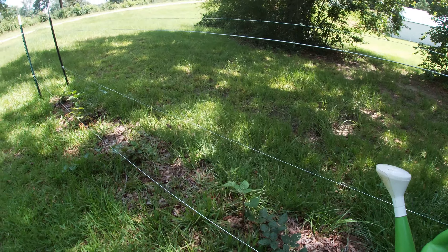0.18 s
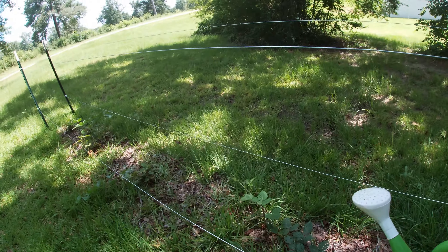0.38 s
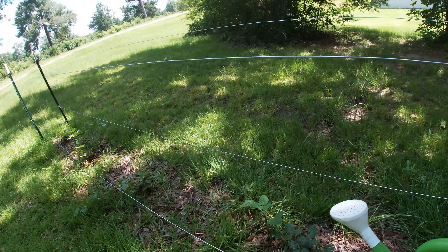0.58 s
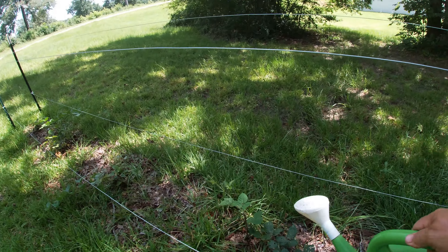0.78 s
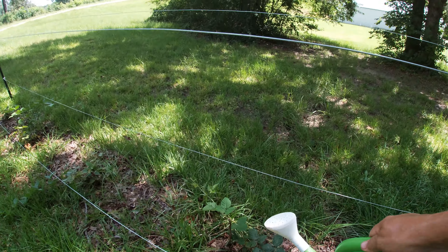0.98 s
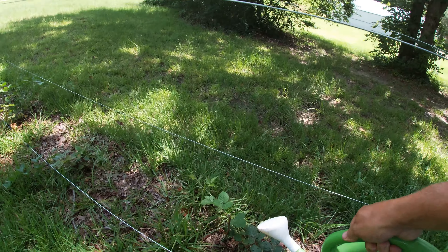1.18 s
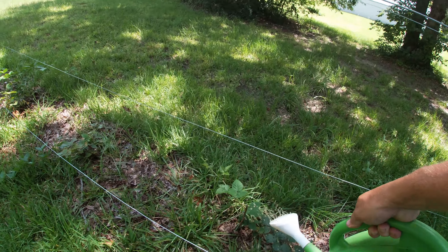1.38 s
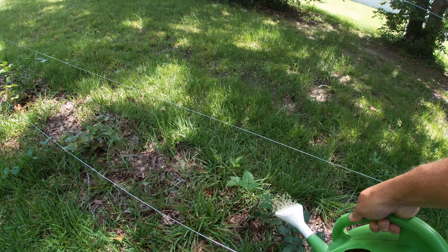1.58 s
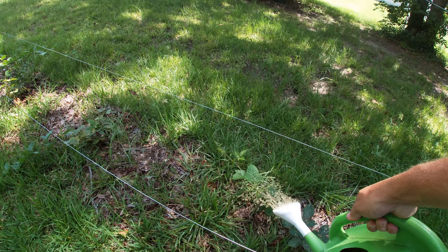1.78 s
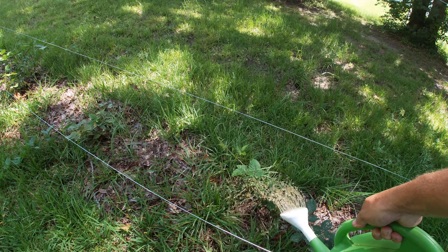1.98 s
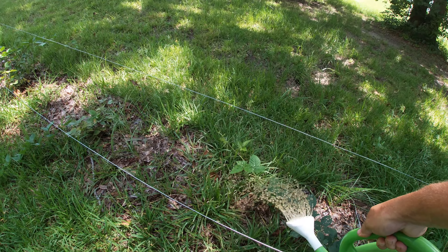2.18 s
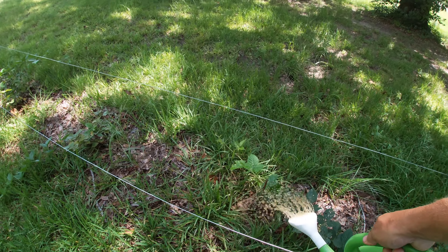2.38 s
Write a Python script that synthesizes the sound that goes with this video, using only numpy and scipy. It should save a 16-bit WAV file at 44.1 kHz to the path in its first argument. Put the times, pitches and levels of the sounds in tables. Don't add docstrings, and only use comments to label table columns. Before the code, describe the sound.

Watering can pouring onto plants, outdoors, close microphone. Soft leaf hiss and a faint distant engine hum throughout. Grass crackles and swishes until 0.4 s; loud low wind thumps the microphone from 0.2 to 0.6 s. One bird chip at 0.64, small stem ticks, then a hollow plastic knock at 1.03. From 1.4 s water gurgles in surges, bubbles and gulps air, with bright drops pattering on leaves to the end.

```python
import sys
import numpy as np
from scipy import signal
from scipy.fft import rfft, irfft
from scipy.io import wavfile
from scipy.ndimage import uniform_filter1d

SR = 44100
rng = np.random.default_rng(int(sys.argv[2]) if len(sys.argv) > 2 else 0)


def digitize_waveform(pressure):
    field = np.atleast_2d(pressure).T
    bounded = np.clip(field, -1, 1)
    quanta = np.round(bounded * 32767).astype(np.int16)
    wavfile.write(sys.argv[1], SR, quanta)


def volts_from_db(level):
    exponent = np.asarray(level, float) / 20
    return 10 ** exponent


N = 105840
T = np.arange(N) / SR


def noise():
    return rng.standard_normal(N)


def sine(hz):
    return np.sin(2 * np.pi * hz * T)


def rms_one(x):
    return x / np.sqrt(np.mean(x ** 2) + 1e-20)


def in_time(rows):
    s, *columns = np.transpose(rows)
    return [np.interp(T, s, column) for column in columns]


def drift(rate_hz):
    step = 40
    r = np.exp(-2 * np.pi * rate_hz * step / SR)
    settle = 2000
    draws = rng.standard_normal(N // step + settle + 2)
    slow = signal.lfilter([1], [1, -2 * r, r * r], draws)[settle:]
    return np.interp(np.arange(N) / step, np.arange(len(slow)), rms_one(slow))


def ring(x, hz, t60_s):
    r = volts_from_db(-60 / (t60_s * SR))
    w = 2 * np.pi * hz / SR
    return signal.lfilter([0, np.sin(w)], [1, -2 * r * np.cos(w), r * r], x + 1e-18)


def colour(x, spectrum):
    hz, db = np.transpose(spectrum)
    octave = np.log2(np.fft.rfftfreq(N, 1 / SR) + 1)
    ends = np.log2(hz)
    beyond = np.maximum(ends[0] - octave, 0) + np.maximum(octave - ends[-1], 0)
    gain_db = np.interp(octave, ends, db) - 36 * beyond
    return rms_one(irfft(rfft(x) * volts_from_db(gain_db), N))


def grains(per_s, spread_db, hiss):
    size = volts_from_db(spread_db * np.minimum(rng.exponential(1, N), 4))
    size = size * rng.choice([-1, 1], N)
    clicks = size * (rng.random(N) < per_s / SR)
    return rms_one(clicks) + hiss * noise()


def burst(s, rise_s, t60_s):
    rise = np.exp(-2 * ((T - s) / rise_s) ** 2)
    fall = volts_from_db(-60 * np.maximum(T - s, 0) / t60_s)
    return np.where(T < s, rise, fall)


def plink(s, db, hz, cycles, rise):
    t = np.arange(int(cycles / hz * SR)) / SR
    fade = volts_from_db(db - 60 * t * hz / cycles)
    soft_start = 1 - np.exp(-t * hz * 2.8)
    turns = hz * (t + rise * hz / cycles * t * t / 2)
    x = fade * np.sin(2 * np.pi * turns) * soft_start
    out = np.zeros(N + SR)
    start = int(s * SR)
    out[start:start + len(x)] = x
    return out[:N]


def plinks(rows, trim_db, cycles, rise):
    return sum(plink(s, db + trim_db, hz, cycles, rise) for s, db, hz in rows)


def fizz(per_s, spread_db, low_hz, high_hz, cycles):
    born = grains(per_s, spread_db, hiss=0)
    dealt = rng.integers(0, 16, N)
    out = np.zeros(N)
    for k, hz in enumerate(np.geomspace(low_hz, high_hz, 16)):
        out += ring(born * (dealt == k), hz, cycles / hz) * np.sqrt(hz)
    return rms_one(out)


# pitch in Hz, level in dB per Hz.
TRAFFIC_TONE = [(25, -8), (150, -4.5), (330, -17), (500, -17), (1400, -22.5), (1750, -23.5)]
LEAF_TONE = [(2200, -10.5), (2800, -8), (4000, -5), (6560, -6.5), (8500, -14.5), (9700, -13),
             (11200, -29.5), (15000, -34)]
# pitch in Hz, width in Hz, level in dB.
ENGINE_HUM = [(72.54, 1, -57), (131.7, 3.7, -65.5), (169.4, 28, -58), (1338, 60, -72)]
# time in seconds, change of the air in
# dB, dry rustle in dB.
AIR_AND_RUSTLE = [
    (0, 1.5, -61),
    (.4, 3, -61.5),
    (.47, 2.5, -73),
    (.69, 0.5, -80),
    (.73, 1.5, -61.5),
    (1.0, 2, -67.5),
    (1.13, 0, -89),
    (1.45, 0.5, -67),
    (2.4, 2, -71),
]


def air():
    out = volts_from_db(-55.5 + drift(8.5)) * colour(noise(), TRAFFIC_TONE)
    leaves = colour(grains(3000, 2.2, hiss=1.77), LEAF_TONE)
    out += volts_from_db(-55.5 + drift(8) / 2) * leaves
    out *= volts_from_db(in_time(AIR_AND_RUSTLE)[0])
    wobble = 0.51 * drift(1.3)
    out += volts_from_db(-59.5 + 0.75 * drift(6.8)) * np.sin(2 * np.pi * 74.4 * T + wobble)
    for hz, width_hz, db in ENGINE_HUM:
        out += volts_from_db(db) * rms_one(ring(noise(), hz, 3.6 / width_hz))
    return out


# time in seconds, level in dB, low whoosh against crackle in dB.
SWISH = [
    (0, -51, -12),
    (.1, -51.5, -1.5),
    (.2, -53, 3),
    (.29, -50.5, 5.5),
    (.45, -44.5, -3),
]
# pitch in Hz, level in dB.
CRACKLE_TONE = [(1500, -2), (1930, -9), (2640, -2), (7980, -6.5), (9990, -11.5), (11200, -24), (15000, -29)]
WHOOSH_TONE = [(300, -12.5), (506, 0), (800, -6), (1700, -15)]


def swish():
    db, low_db = in_time(SWISH)
    fade = np.clip((0.39 - T) / 0.08, 0, 1)
    crackle = volts_from_db(0.5 + 1.3 * drift(30)) * colour(grains(1500, 4.7, hiss=1.2), CRACKLE_TONE)
    whoosh = volts_from_db(2.0 * drift(15)) * colour(noise(), WHOOSH_TONE)
    whistle = sum(rms_one(ring(crackle, k * 1312, 0.12)) / k for k in (1, 2, 3.45))
    low = whoosh + volts_from_db(-6) * whistle
    return fade * volts_from_db(db) * (crackle + volts_from_db(low_db) * low)


# start in seconds, level in dB, pitch in Hz.
TICKS = [
    (0.0712, -45, 2740),
    (0.715, -48.5, 2100),
    (0.826, -47.5, 1950),
    (.923, -50, 2540),
    (.941, -59, 3000),
    (1.506, -54, 2300),
    (1.626, -44, 2400),
    (1.654, -56, 2000),
    (1.786, -37, 2300),
]
# pitch in Hz, level in dB.
RUSTLE_TONE = [(1300, -7), (1900, -4.5), (2700, 8)]


def stems():
    tick_noise = noise()
    out = np.zeros(N)
    for s, db, hz in TICKS:
        out += volts_from_db(db) * burst(s + 0.0011, 0.00076, 0.014) * rms_one(ring(tick_noise, hz, 5.9 / hz))
    out += volts_from_db(in_time(AIR_AND_RUSTLE)[1]) * colour(noise(), RUSTLE_TONE)
    insect = rms_one(ring(noise(), 9630, 0.015))
    rumble = np.clip(T - 1.2, 0, 1) * rms_one(ring(noise(), 38.0, 0.092))
    return out + volts_from_db(-73.5) * insect + volts_from_db(-64) * rumble


# peak time in seconds, level in dB, rise in seconds,
# time to fall 60 dB in seconds, sharp edge against the body in dB.
GUSTS = [
    (0.206, -28, 0.01, 0.29, -28),
    (0.239, -36, 0.032, 0.59, -4.5),
    (0.314, -11.5, 0.011, 0.18, -10.5),
    (0.336, -12.5, 0.0074, 0.12, -38),
    (0.362, -20.5, 0.0051, 0.1, -38),
    (0.399, -13, 0.0093, 0.2, -25),
    (0.436, -19.5, 0.017, 0.12, -32),
    (0.564, -20.5, 0.016, 0.25, -25),
    (0.601, -16.5, 0.017, 0.066, -28.5),
    (.64, -54, 0.036, 0.59, -39),
]
# start in seconds, level in dB, pitch in Hz.
FLAPS = [
    (0.308, -4.5, 157),
    (0.321, -9.5, 190),
    (0.361, -16, 138),
    (0.393, -19, 150),
    (0.435, -22, 175),
    (.409, -26, 327),
    (.556, -29, 298),
    (.584, -24, 170),
]
# pitch in Hz, level in dB.
WIND_TONE = [(20, 11), (35, 5), (70, 4), (150, -1.5), (230, -11), (330, -21.5), (500, -31)]
EDGE_TONE = [(150, -11), (300, 0.5), (550, -2.5), (900, -12.5), (1400, -21), (2200, -37)]


def wind():
    body, edge = np.zeros(N), np.zeros(N)
    for s, db, rise_s, fall_s, edge_db in GUSTS:
        body += volts_from_db(db) * burst(s, rise_s, fall_s)
        edge += volts_from_db(db + edge_db) * burst(s, rise_s * 0.81, fall_s * 0.49)
    low = colour(noise(), WIND_TONE)
    low = low / np.sqrt(uniform_filter1d(low ** 2, size=1400) + 0.17)
    flaps = plinks(FLAPS, 0, cycles=8.0, rise=-0.022)
    return flaps + body * low + edge * volts_from_db(-2.0) * colour(noise(), EDGE_TONE)


def bird():
    start_s, hz, climb_hz_per_s = 0.6362, 4280, 18000
    echo_s, spread_hz = 0.03, 750
    chip = burst(start_s + 0.0011, 0.00079, 0.0088) * sine(hz)
    t = np.maximum(T - start_s, 0)
    smooth = signal.butter(4, spread_hz, fs=SR, output="sos")
    spread = signal.sosfilt(smooth, grains(2300, 2.3, hiss=3.5))
    scatter = rms_one(spread * np.sin(2 * np.pi * (hz * T + climb_hz_per_s * t * t / 2)))
    gate = np.clip(t / 0.002, 0, 1) * np.clip((echo_s - t) / 0.005, 0, 1) * volts_from_db(-180 * t)
    return volts_from_db(-32.5) * chip + volts_from_db(-43) * gate * scatter


# time in seconds, level in dB, pitch in Hz above which it is soft.
KNOCKS = [
    (1.028, -38, 3000),
    (1.0338, -25.5, 3500),
    (1.0365, -30.5, 1500),
    (1.043, -27, 1800),
    (1.049, -62, 900),
    (1.055, -31.5, 1200),
]
# pitch in Hz, level in dB, time to fall 60 dB in seconds.
CAN_WALL = [(240, -5, 0.12), (337, -8.5, 0.081), (656, 0.5, 0.048), (780, 7.5, 0.014), (1235, -7, 0.028),
            (1640, -4.5, 0.024), (2120, -7, 0.029), (2620, -4.5, 0.02), (3290, -1, 0.0074),
            (4200, -5, 0.027)]
# pitch in Hz, level in dB.
SPRING = [(1620, -47), (2380, -39.5), (3120, -50), (4000, -44)]
# pitch in Hz, level in dB.
SLAP_TONE = [(200, 5), (700, -10), (1500, -4), (4300, -10), (5000, -28)]


def knock():
    out = np.zeros(N)
    luck_db = rng.normal(0, 2.45, (len(KNOCKS), len(CAN_WALL)))
    for k, (hz, db, t60_s) in enumerate(CAN_WALL):
        clicks = np.zeros(N)
        for j, (s, hit_db, soft_hz) in enumerate(KNOCKS):
            softness = 1 + (hz / soft_hz) ** 2
            clicks[int(s * SR)] = volts_from_db(hit_db + db - 5.5 + luck_db[j, k]) / softness
        out += ring(clicks, hz, t60_s) * (-1) ** k
    for hz, db in SPRING:
        out += plink(1.042, db, hz, cycles=0.085 * hz, rise=0.35)
    slap = sum(volts_from_db(db - 19) * burst(s + 0.00047, 0.0015, 0.069) for s, db, _ in KNOCKS)
    return out + slap * colour(noise(), SLAP_TONE)


# time in seconds, steady gurgle in dB, patter on leaves in dB.
FLOW = [
    (1.4, -52.5, -60),
    (1.74, -58.5, -63),
    (1.765, -50, -47.5),
    (1.92, -55.5, -61.5),
    (2.03, -54, -51),
    (2.1, -53.5, -52),
    (2.4, -55.5, -49.5),
]
# start in seconds, length in seconds, level in dB.
SURGES = [(1.502, 0.025, -59), (1.601, 0.06, -51), (1.675, 0.039, -52), (1.754, 0.022, -48),
          (1.797, 0.042, -54), (1.863, 0.029, -52), (1.928, 0.048, -51), (1.996, 0.063, -46.5),
          (2.123, 0.077, -49.5), (2.205, 0.067, -52.5), (2.301, 0.036, -56), (2.356, 0.034, -52)]
# start in seconds, level in dB, pitch in Hz.
BUBBLES = [(1.504, -39, 1445), (1.878, -35, 740), (1.931, -42, 1400), (1.953, -39, 704), (1.996, -38, 620),
           (2.034, -35, 1026), (2.046, -38, 1700), (2.135, -39, 1230), (2.148, -39, 1630),
           (2.227, -40, 780), (2.266, -38, 653), (2.284, -41, 626), (1.605, -33, 1436), (1.651, -40, 1450),
           (1.681, -33.5, 1190), (1.76, -40, 785), (1.862, -41, 690), (2.013, -41, 640), (2.159, -35, 1730),
           (2.225, -32, 1510), (2.249, -37, 656), (2.309, -34.5, 1590), (2.362, -41, 1640)]
# start in seconds, level in dB, pitch in Hz.
GULPS = [
    (1.765, -35.5, 290),
    (1.897, -36, 296),
    (2.045, -37.5, 320),
    (1.798, -36, 290),
    (1.832, -32.5, 282),
    (1.876, -28, 195),
    (1.909, -36, 215),
    (1.961, -31, 194),
    (2.021, -30.5, 317),
]
# pitch in Hz, level in dB.
GURGLE_TONE = [(130, -1.5), (200, -6.5), (300, -4), (420, -16.5), (700, -13), (1600, -19), (2600, -20)]
SPOUT_TONE = [(450, -6.5), (700, -5), (1250, -10.5), (1650, -3), (1950, -16), (3500, -19)]
PATTER_TONE = [(2000, -4), (2820, -9.5), (5310, 2), (7170, -9), (8730, -2), (11000, -17), (15000, -26)]
SPLAT_TONE = [(1500, -6), (3000, -6.5), (5500, 1.5), (7300, -3), (8700, 0.5), (10000, -17), (12000, -32)]
# start in seconds, level in dB, pitch in Hz.
DROPS = [(0.211, -40, 4470), (0.3504, -51, 3220), (1.698, -46, 5600), (1.7172, -44, 5500),
         (1.7579, -35.5, 4750), (1.7868, -34, 5800), (1.8105, -39, 5400), (1.8849, -37, 5440),
         (1.9416, -40.5, 5000), (1.962, -38.5, 4600), (2.006, -32.5, 5300), (2.021, -31, 5000),
         (2.0428, -31.5, 5600), (2.128, -40, 6200), (2.147, -39, 5640), (2.205, -34, 4570),
         (2.2227, -28.5, 5200), (2.2628, -33, 6220), (2.2924, -42, 5600), (2.3083, -34, 4200),
         (2.312, -38, 6360), (2.359, -30.5, 6200), (2.366, -32.5, 5500)]
DRIPS = [(1.571, -46, 3380), (1.63, -45, 6200), (1.6494, -40.5, 3230), (1.6853, -41, 5180),
         (1.719, -51, 8860), (1.7613, -40, 8660), (1.763, -35, 5870), (1.8234, -36, 5230),
         (1.84, -40.5, 3940), (1.891, -41.5, 3420), (1.9407, -43, 8980), (1.9642, -42, 8950),
         (1.978, -42.5, 3700), (2.017, -44, 2620), (2.0344, -43, 8650), (2.0744, -44, 8900),
         (2.1355, -37.5, 8560), (2.2036, -44, 8880), (2.234, -38, 4580), (2.264, -41, 2140),
         (2.3677, -45, 8400), (2.377, -34, 5300)]


def pouring():
    return np.clip((T - 1.386) / 0.17, 0, 1)


def spout():
    bubbles = fizz(230, 3.2, 597, 1870, cycles=24.0)
    gurgle = volts_from_db(1.9 * drift(22)) * colour(grains(900, 3.1, hiss=1.0), GURGLE_TONE)
    gurgle += volts_from_db(-4) * bubbles
    out = pouring() * volts_from_db(in_time(FLOW)[0]) * gurgle
    surge = np.zeros(N)
    for s, length_s, db in SURGES:
        swell = (T - s) / 0.013
        ebb = (s + length_s - T) / 0.011 + 1
        surge += volts_from_db(db) * np.clip(np.minimum(swell, ebb), 0, 1)
    out += surge * rms_one(colour(grains(700, 3.0, hiss=0.76), SPOUT_TONE) + 0.33 * bubbles)
    out += plinks(BUBBLES, -2.5, cycles=40.0, rise=0.2)
    return out + plinks(GULPS, -5.5, cycles=27.5, rise=0.067)


def leaf_drops():
    spray = grains(2000, 5.4, hiss=1.25) + 1.5 * fizz(3500, 3.6, 2480, 12800, cycles=36.0)
    patter = volts_from_db(2.2 * drift(31)) * colour(spray, PATTER_TONE)
    out = pouring() * volts_from_db(in_time(FLOW)[1]) * patter
    out += plinks(DROPS, 0, cycles=38.0, rise=0.65)
    out += plinks(DRIPS, 0, cycles=78.0, rise=0.11)
    splat = sum(volts_from_db(db - 7.0) * burst(s + 0.0017, 0.00071, 0.015) for s, db, _ in DROPS)
    return out + splat * colour(noise(), SPLAT_TONE)


def scene():
    out = air() + swish() + stems() + wind() + bird() + knock() + spout() + leaf_drops()
    return out[None]


def roll_off(x):
    return signal.sosfilt(signal.butter(12, 15720, fs=SR, output="sos"), x)


def record(dry):
    mix = 0.57 * np.tanh(dry / 0.65)
    return roll_off(mix)


dry = scene()
out = record(dry)
digitize_waveform(out)
```